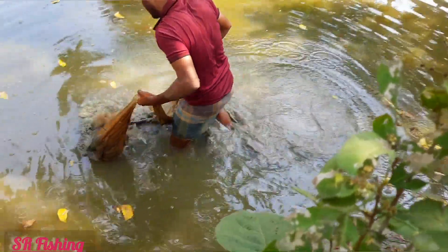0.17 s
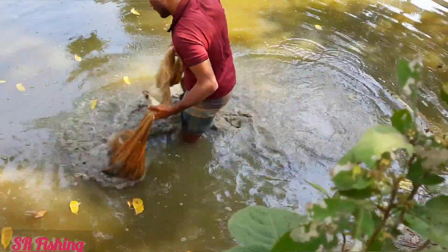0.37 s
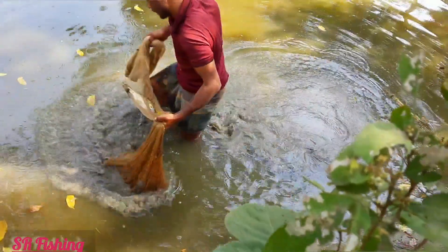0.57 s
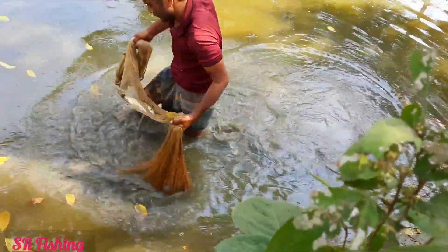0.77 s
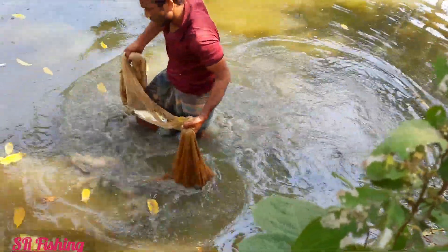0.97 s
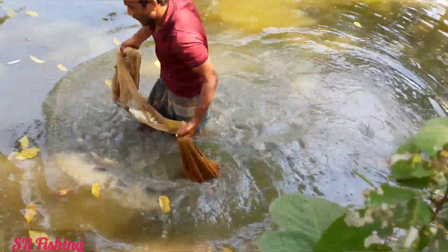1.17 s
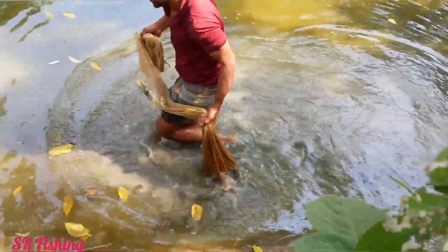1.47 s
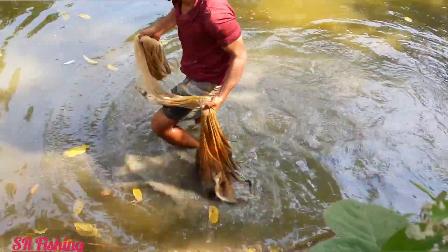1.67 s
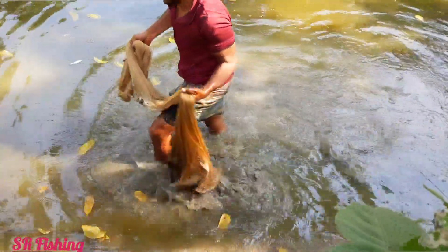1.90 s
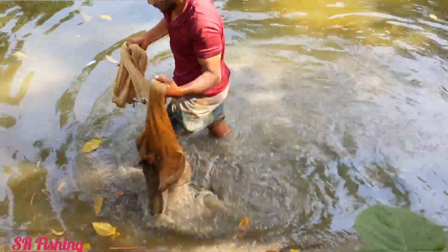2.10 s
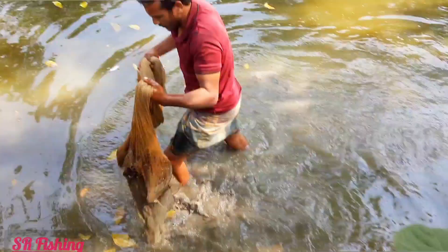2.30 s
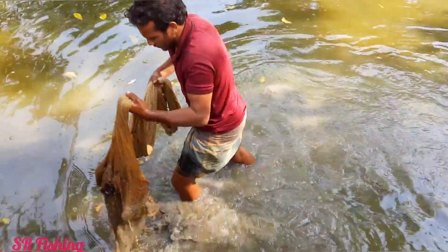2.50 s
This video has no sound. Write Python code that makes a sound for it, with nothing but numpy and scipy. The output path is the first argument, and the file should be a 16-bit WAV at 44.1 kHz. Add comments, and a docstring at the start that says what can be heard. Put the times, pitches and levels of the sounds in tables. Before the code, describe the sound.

Water washes and gurgles around a wet net in a shallow pond, strongest at first, then thinning to drips before fresh sloshing. Birds chirp early outdoors; wind thumps the left microphone side while the right stays clear.

```python
"""Wet net in a shallow pond

A wet net is dragged and lifted through a pond: wash, bubbles, drips and small splashes, with birds nearby.
The wash is filtered noise full of tiny ringing bubbles; larger bubbles are dying sines that rise in pitch.
Splashes are noise bursts and birds are shaky gliding tones, both with a short echo. Low noise rumbles below.
Wind buffets the left microphone port, where the rest arrives muffled most of the time; the right stays clear."""
import sys
import numpy as np
from scipy import signal
from scipy.fft import rfft, irfft
from scipy.io import wavfile
from scipy.ndimage import uniform_filter1d

SR = 44100
rng = np.random.default_rng(int(sys.argv[2]) if len(sys.argv) > 2 else 0)


def waveform_to_disk(signal):
    """Save audio, clipped to [-1, 1], as 16-bit WAV at the path in sys.argv[1]."""
    frames = np.transpose(np.atleast_2d(signal))
    scaled = np.clip(frames, -1, 1) * 32767
    samples = np.round(scaled).astype(np.int16)
    wavfile.write(sys.argv[1], SR, samples)


N = 116865  # length in samples


def gain_of(db):
    """Turns dB into a factor for the waveform."""
    return 10 ** (np.asarray(db) / 20)


def evened(x):
    """Scales a sound to an rms (average strength) of 1."""
    return x / np.sqrt(np.mean(x ** 2) + 1e-20)


def read(points, hz):
    """Reads a table of values over frequency, going evenly in log frequency between its points."""
    table_hz, value = np.transpose(points)
    return np.interp(np.log(hz + 1), np.log(table_hz + 1), value)


def curve(rows, order=1):
    """Reads one column of a table over time, at every sample."""
    rows = np.array(rows)
    return np.interp(np.arange(N) / SR, rows[:, 0], rows[:, order])


def add(mix, s, sound):
    """Mixes a sound in, starting at s seconds."""
    part = mix[max(round(s * SR), 0):][:len(sound)]
    part += sound[:len(part)]


def colour(x, points):
    """Makes each frequency louder or softer by a table in dB."""
    gain = gain_of(read(points, np.fft.rfftfreq(x.shape[-1], 1 / SR)))
    return irfft(rfft(x) * gain, x.shape[-1])


def wobble(rate_hz):
    """Random wandering of rms 1: noise with what is faster than rate_hz filtered down."""
    lowpass = signal.butter(2, rate_hz, fs=SR, output="sos")
    return evened(signal.sosfilt(lowpass, rng.standard_normal(N)))


def ring(hz, cycles, rise):
    """One bubble: a sine that starts softly, dies away and rises in pitch."""
    u = np.arange(int(2 * cycles * SR / hz)) * hz / SR  # time counted in cycles of the first pitch
    tone = np.sin(2 * np.pi * u * (1 + rise * u / cycles))
    return tone * np.exp(-3 * u / cycles) * (1 - np.exp(-u))


def grains(lo_hz, hi_hz, per_s, cycles, spread_db):
    """Many small bubbles at random moments, each with one of 30 pitches and a random strength."""
    starts = rng.random(N) < per_s / SR
    size = gain_of(spread_db * np.minimum(rng.exponential(1, N), 4)) * starts
    kind = rng.integers(0, 30, N)
    out = np.zeros(N)
    for k, hz in enumerate(np.geomspace(lo_hz, hi_hz, 30)):
        bubble = ring(hz, cycles, 0.085) * np.sqrt(hz)  # the root makes up for shorter ringing
        out += signal.oaconvolve(size * (kind == k), bubble)[:N]
    return evened(out)


def wash(spectrum, patchy_db, flicker_db):
    """Coloured noise with random louder and softer patches in time and pitch, and a flickering level."""
    _, _, z = signal.stft(rng.standard_normal(N), SR, nperseg=256)
    patches = uniform_filter1d(rng.standard_normal(z.shape), 5, 0)
    patches = evened(uniform_filter1d(patches, 8, 1))
    x = signal.istft(z * gain_of(patchy_db * patches), SR, nperseg=256)[1][:N]
    return evened(colour(x, spectrum) * gain_of(flicker_db * wobble(29.6)))


def water():
    """Gurgle, trickle and fizz are noise with bubble rings; ticks join the fizz and mist lies on top."""
    # Each row: time in seconds, then the levels of gurgle, trickle and fizz in dB, before the patter.
    levels = [(0, -42, -49, -40), (.15, -48.5, -45.5, -40), (.21, -41, -52, -37.5), (.3, -47.5, -51, -40.5),
              (.36, -44, -51.5, -39.5), (.45, -49, -49.5, -44), (.6, -50, -54.5, -47),
              (.78, -47.5, -49.5, -41), (.9, -49, -53, -46), (1.02, -53, -61.5, -51),
              (1.22, -57.5, -59, -54), (1.3, -60, -63, -53), (1.33, -49, -52, -50.5),
              (1.41, -58.5, -63, -50.5), (1.52, -48, -47.5, -46), (1.59, -53.5, -60, -48),
              (1.65, -45.5, -43, -40), (1.78, -54.5, -52, -44.5), (1.88, -46, -49, -43.5),
              (2.02, -51.5, -52.5, -42.5), (2.2, -54.5, -52.5, -45), (2.42, -51, -48, -37.5),
              (2.55, -55.5, -49, -41.5), (2.65, -47.5, -48.5, -41.5)]
    # Level of the mist, before the patter. Each row: time in seconds, level in dB.
    mist_levels = [(0, -55), (.21, -44.5), (.4, -57), (.62, -67), (.82, -55), (1.05, -63), (1.4, -67),
                   (1.5, -55), (1.6, -62), (1.66, -56), (2.15, -66), (2.38, -56), (2.65, -66)]
    # Tone colours of the four kinds of noise. Each row: frequency in Hz, relative level in dB.
    gurgle = [(200, -4), (400, -11), (750, 2.5), (1100, -1), (1600, -30), (3000, -21)]
    trickle = [(600, -19), (1100, 1.5), (1600, 8.5), (2400, 4), (3500, -3), (6000, -18)]
    fizz = [(1000, -51), (2500, -0.5), (4000, 3), (6000, 7.5), (9000, 9), (12000, -1.5), (16000, -18)]
    mist_colour = [(8000, -38), (11000, -11), (16000, -6)]
    # rings per second, and levels in dB against the noise around them
    bubbles_per_s, bubbles_db = 350, -2.5
    spray_per_s, spray_db = 1900, -6.5
    ticks_per_s, ticks_db = 900, -7

    low = wash(gurgle, patchy_db=1.5, flicker_db=3.4)
    low += gain_of(bubbles_db) * grains(463.6, 1264, bubbles_per_s, cycles=21.2, spread_db=5.5)
    mid = wash(trickle, patchy_db=-0.5, flicker_db=2.5)
    mid += gain_of(bubbles_db) * grains(1090, 3046, 2 * bubbles_per_s, cycles=14.6, spread_db=2.5)
    high = wash(fizz, patchy_db=1.2, flicker_db=1.5)
    high += gain_of(spray_db) * grains(2992, 7610, spray_per_s, cycles=19.4, spread_db=4.5)
    high += gain_of(ticks_db) * grains(1484, 8770, ticks_per_s, cycles=3.9, spread_db=3)

    out = gain_of(curve(mist_levels)) * wash(mist_colour, patchy_db=1.0, flicker_db=1.5)
    for order, layer in enumerate([low, mid, high], start=1):
        out += evened(layer) * gain_of(curve(levels, order))
    patter = gain_of(1.14 * wobble(24))  # all of the water flickers together
    return patter * out


def bubbles():
    """Bubbles that stand out: each rings as a dying sine that rises in pitch."""
    # Each row: start in seconds, strength in dB, first pitch in Hz.
    single_bubbles = [(.05, -30, 2040), (0.095, -27, 902), (.111, -29, 770), (.13, -27, 773),
                      (0.139, -32.5, 238), (.146, -29, 892), (.162, -27.5, 770), (.179, -32, 520),
                      (.242, -30.5, 652), (.314, -36, 2250), (.36, -40, 944), (.485, -28, 876),
                      (0.596, -34, 786), (0.676, -36, 1250), (.682, -34, 846), (0.742, -37, 254),
                      (0.767, -31, 1310), (.823, -33, 1740), (.917, -36, 790), (1, -38, 1640),
                      (1.045, -40, 840), (1.14, -41.5, 2030), (1.327, -36.5, 555), (1.329, -37, 1096),
                      (1.499, -38, 900), (1.529, -32.5, 1010), (1.617, -39, 560), (1.637, -39, 364),
                      (1.641, -33, 1270), (1.655, -38, 846), (1.66, -37, 2270), (1.673, -34.5, 1190),
                      (1.689, -30, 1590), (1.853, -31.5, 700), (1.855, -31.5, 812), (1.922, -30, 1020),
                      (1.973, -36, 1000), (2.074, -35.5, 945), (2.443, -32, 2720), (2.459, -33, 1810),
                      (2.572, -36, 1070), (2.63, -38, 1060)]
    out = np.zeros(N)
    for s, db, hz in single_bubbles:
        cycles = 16 * np.sqrt(hz / 1000)  # higher bubbles ring for more cycles
        add(out, s, gain_of(db) * ring(hz, cycles, rise=0.06))
    return out


def splashes():
    """Drops that splash: a tick, then a dying burst of noise, wide with a coloured centre."""
    # Each row: start in seconds, strength in dB, centre in Hz, strength of the wide noise in dB.
    drops = [(0.2046, -28, 8100, -1), (0.2423, -38, 5600, 6), (0.518, -34, 3940, -13),
             (0.5585, -32.5, 6900, -2), (.7, -46.5, 12100, -9), (0.9388, -45.5, 5560, 8),
             (1.093, -46.5, 3540, -12), (1.279, -43.5, 7060, -19), (1.31, -36, 5940, 1),
             (1.327, -43, 2960, -3), (1.353, -55, 5500, -4), (1.4294, -43, 6570, -22),
             (1.476, -50.5, 12400, -4), (1.502, -42, 4840, -8), (1.515, -41.5, 5560, -3),
             (1.6185, -41, 5500, -11), (1.6407, -37.5, 5440, -10), (1.658, -40, 5100, -11),
             (1.696, -48, 5800, -12), (1.738, -50, 6650, -6), (1.857, -33, 7050, -20),
             (1.8852, -33.5, 6100, -16), (1.9025, -43, 6120, 7), (1.958, -52, 4020, -7),
             (2.1642, -42, 5400, -1), (2.199, -44, 6300, 6), (2.294, -39.5, 13400, -20),
             (2.356, -43, 6750, -11), (2.4104, -38.5, 5760, 4), (2.4547, -34, 3220, -26),
             (2.487, -36, 5060, -20), (2.593, -38, 6750, -15), (2.613, -39, 6200, -12)]
    t60, width_hz = 0.061, 870  # seconds to die by 60 dB; width of the coloured centre
    tick_db = -7  # against the start of the burst
    out, t = np.zeros(N), np.arange(2400) / SR
    for s, db, hz, wide_db in drops:
        noise = rng.standard_normal(2400)
        centre = signal.lfilter(*signal.iirpeak(hz, hz / width_hz, SR), noise)
        burst = evened(centre) + gain_of(wide_db) * uniform_filter1d(noise, size=3)
        tick = gain_of(db + tick_db) * np.exp(-t / 0.00012)
        add(out, s, (gain_of(db - 60 * t / t60) + tick) * burst)
    return out


def birds():
    """Gliding notes with shaky pitch and level; a weaker tone above each adds to the hoarseness."""
    # Hoarse notes of a near bird, then soft notes of a far one. Each row: start in seconds,
    # length in seconds, level in dB, first pitch in Hz, last pitch in Hz, hoarseness (pitch shake) in Hz.
    chirps = [(0, 0.025, -33, 3710, 4270, 256), (0.103, 0.032, -37.5, 4000, 4170, 101),
              (0.133, 0.061, -36.5, 3600, 4060, 129.6), (0.285, 0.045, -37.5, 4000, 4170, 107),
              (.302, 0.066, -37, 3453, 4150, 143), (0.465, 0.029, -39, 3840, 4060, 110),
              (0.488, 0.073, -37.5, 3404, 4120, 128), (0.737, .1, -42.5, 2810, 3844, 170),
              (0.849, 0.041, -43, 2873, 3005, 35), (1.332, 0.131, -53.5, 2402, 2490, 150),
              (1.926, 0.144, -54, 3750, 3740, 91.5)]
    coos = [(.65, 0.19, -54.5, 754, 701, 34), (1.98, .12, -54, 653, 696, 17),
            (2.12, 0.087, -51.5, 655, 615, 57), (2.19, 0.17, -56.5, 555, 561, 15)]
    broken_db = 3  # unsteadiness of the level
    upper_step, upper_db = 4, -11  # upper tone: distance in hoarseness widths, level against the note
    out, shake, flutter = np.zeros(N), wobble(271), wobble(51)
    for s, length, db, first_hz, last_hz, hoarse_hz in chirps + coos:
        start = round(s * SR)
        at = slice(start, start + int(length * SR))
        u = np.linspace(0, 1, at.stop - at.start)  # 0 to 1 through the note
        hz = first_hz + (last_hz - first_hz) * u + hoarse_hz * shake[at]
        level = np.sin(np.pi * u ** 1.56) ** 0.21 * gain_of(db + broken_db * flutter[at])
        turn = 2 * np.pi * np.cumsum(hz) / SR
        upper_turn = turn + 2 * np.pi * upper_step * hoarse_hz * length * u
        note = np.sin(turn) + gain_of(upper_db) * np.sin(upper_turn)
        add(out, s, np.sqrt(2) * level * note)
    return out


def banks(x, echo_db):
    """A short blurred echo from the banks: copies of the sound along a dying noise tail."""
    t60 = 0.39  # seconds for the echo to die by 60 dB
    t = np.arange(SR // 3) / SR
    tail = rng.standard_normal(len(t)) * gain_of(-60 * t / t60)
    return x + gain_of(echo_db) * signal.fftconvolve(x, tail / np.linalg.norm(tail))[:N]


def breeze_and_gusts():
    """Lumpy low noise: a breeze, and gusts that swell and fade like a bell curve and reach higher in pitch."""
    # Steady breeze, before the lumps. Each row: time in seconds, level in dB.
    breeze = [(0, -72), (.1, -98), (.25, -33), (.45, -35), (.6, -41), (.9, -40.5), (1.2, -35.5),
              (1.5, -38.5), (1.8, -39), (2.05, -38.5), (2.2, -44.5), (2.45, -47), (2.65, -53)]
    # Each row: middle of the gust in seconds, width in seconds, peak level in dB before the lumps,
    # corner in Hz (a higher one stretches the gust's tone colour upwards).
    gusts = [(0.151, 0.022, -32.5, 395), (0.227, 0.019, -17.5, 176), (0.326, 0.023, -19.5, 158),
             (0.397, 0.018, -32.5, 95), (0.497, 0.032, -11.5, 269), (.645, 0.023, -34, 226),
             (0.698, 0.045, -20.5, 190), (0.767, 0.026, -21.5, 254), (0.905, 0.015, -29.5, 99),
             (1.161, 0.026, -43, 290), (1.331, 0.06, -41, 268), (1.49, 0.014, -33.5, 210),
             (1.618, 0.031, -34, 239), (1.918, 0.027, -29, 171), (2.123, 0.017, -35, 317),
             (2.233, 0.03, -40, 177), (2.376, 0.021, -24, 318), (2.619, 0.042, -34.5, 350)]
    # Tone colours of the breeze, and of a gust with its corner at 200 Hz.
    # Each row: frequency in Hz, relative level in dB.
    calm_colour = [(25, -16), (45, -3), (65, 3.5), (120, -2), (180, -17.5), (260, -21), (500, -53.5),
                   (1200, -55), (16000, -82)]
    gust_colour = [(25, -15), (60, 7.5), (120, 5.5), (200, 1), (320, -8.5), (600, -21), (1200, -37),
                   (2400, -53.5), (5000, -71), (16000, -82)]
    lumps_db = 1
    t, hz = np.arange(N) / SR, np.fft.rfftfreq(N, 1 / SR)
    white = rfft(rng.standard_normal(N))
    out = gain_of(curve(breeze)) * evened(colour(rng.standard_normal(N), calm_colour))
    for s, width, db, corner_hz in gusts:
        noise = evened(irfft(white * gain_of(read(gust_colour, 200 * hz / corner_hz)), N))
        bell = np.exp(-((t - s) / width) ** 2)
        out += gain_of(db) * bell * noise
    return out * gain_of(lumps_db * wobble(70.5))


def knocks():
    """Single knocks of air that snap in and swing out ever slower."""
    # Each row: start in seconds, strength in dB, length of the first swing in seconds.
    air_knocks = [(.2245, -15, .003), (0.3223, -14.5, 0.0038), (.4995, -27, 0.0032), (.514, -9, 0.0032),
                  (.688, -29, 0.0036), (.7735, -32, 0.0019), (1.145, -46, 0.0002), (2.1033, -16, 0.0011),
                  (2.366, -26, 0.0011)]
    fade = 4.1  # time to die to about a third, in lengths of the first swing
    out = np.zeros(N)
    for s, db, length in air_knocks:
        u = np.arange(int(30 * length * SR)) / (length * SR)
        swing = np.sin(np.pi * np.sqrt(u))  # the root slows it down
        add(out, s, -gain_of(db) * swing * (1 - np.exp(-2 * u)) * np.exp(-u / fade))
    return out


def rumble():
    """Low background noise whose level drifts slightly."""
    # Each row: frequency in Hz, relative level in dB.
    rumble_colour = [(25, 10), (60, 15.5), (100, 2), (200, -1.5), (400, -1), (1000, -27), (16000, -34)]
    return gain_of(-53.5 + 0.21 * wobble(5.9)) * evened(colour(rng.standard_normal(N), rumble_colour))


def left_port(x):
    """Dulls the sound by a changing amount and scatters its phase, more so towards the treble."""
    # How muffled the port is. Each row: time in seconds, loss in dB before the share and the limit.
    muffle = [(0, 0.6), (.1, 1.1), (.16, 20), (.24, 180), (.34, 190), (.45, 190), (1.0, 260), (1.58, 150),
              (1.66, 150), (1.76, 210), (2.05, 175), (2.16, 41), (2.26, 126), (2.34, 100), (2.42, 18),
              (2.55, 19), (2.65, 46)]
    # How much of that loss each pitch takes. Each row: frequency in Hz, share as a factor.
    muffle_share = [(300, 0.1), (1000, 0.15), (2200, 0.18), (4500, 0.59), (7000, 1.7), (13000, 0.74)]
    # How alike the two ports are in phase. Each row: frequency in Hz, likeness from 0 to 1.
    likeness = [(300, 0.45), (900, 0.77), (2000, 0.26), (4000, 0.053)]
    most_db = 43  # deepest loss
    hz, t, z = signal.stft(x, SR, nperseg=512)
    loss_db = np.outer(read(muffle_share, hz), np.interp(t, *np.transpose(muffle)))
    scatter = np.pi * (1 - np.clip(read(likeness, hz), 0, 1))
    turn = scatter[:, None] * rng.uniform(-1.26, 1, z.shape)
    z = z * np.exp(1j * turn) * gain_of(-np.minimum(loss_db, most_db))
    return signal.istft(z, SR, nperseg=512)[1][:N]


def scene():
    """The pond at both ports, muffled at the left, where the wind is added."""
    drips = banks(bubbles() + splashes(), echo_db=-11)
    pond = water() + drips + banks(birds(), echo_db=-5) + rumble()
    wind = breeze_and_gusts() + knocks()
    return np.array([left_port(pond) + wind, pond])


def record(dry):
    """Adds the microphone's tone colour and a faint hiss, then cuts off the highest treble."""
    # Tone colour of the microphone. Each row: frequency in Hz, gain in dB.
    mic = [(20, -26), (32, -6), (60, -2.5), (7000, -4.5), (8000, -14), (9300, -27.5), (10500, -16),
           (12500, -4.5), (16000, -3.5)]
    hiss_db, edge_hz = -83, 15760
    x = colour(dry, mic) + gain_of(hiss_db) * rng.standard_normal(dry.shape)
    lowpass = signal.firwin(1023, edge_hz, window=("kaiser", 10), fs=SR)
    return signal.oaconvolve(x, lowpass[None], "same")


dry = scene()
out = record(dry)
waveform_to_disk(out)
```